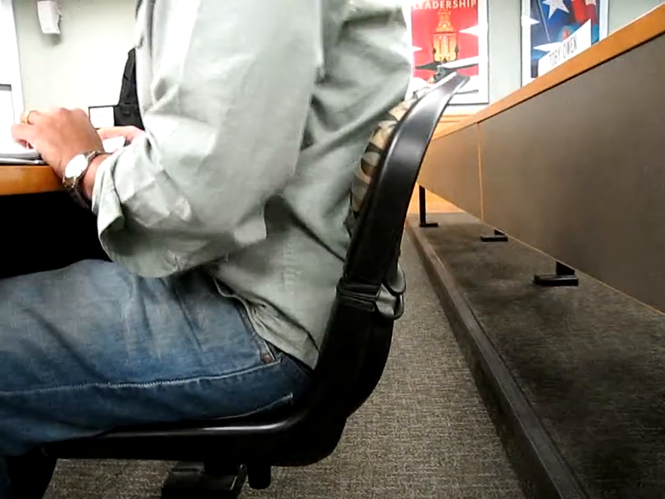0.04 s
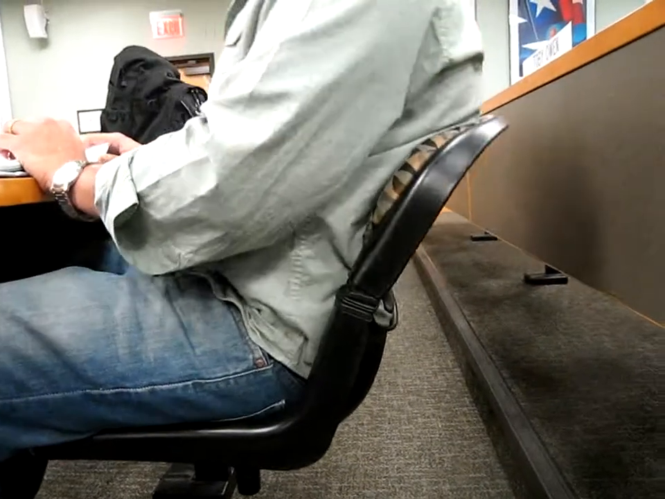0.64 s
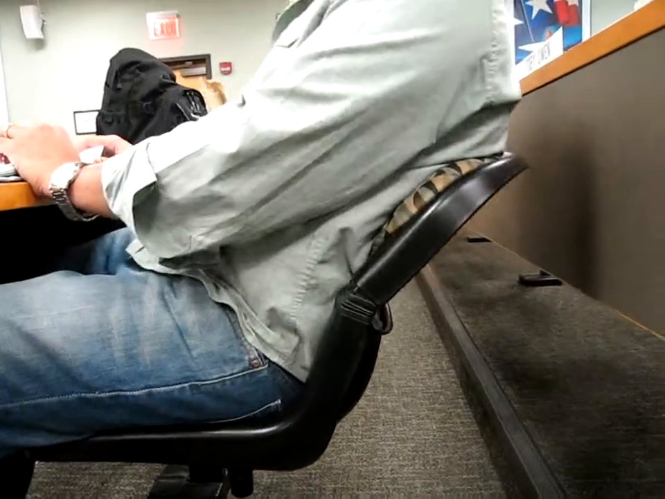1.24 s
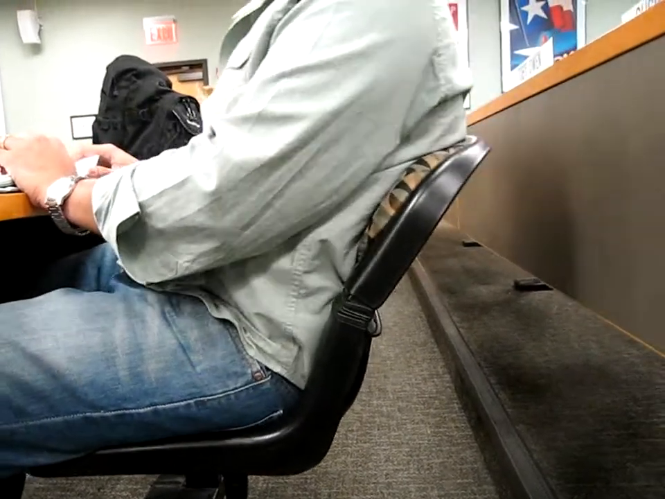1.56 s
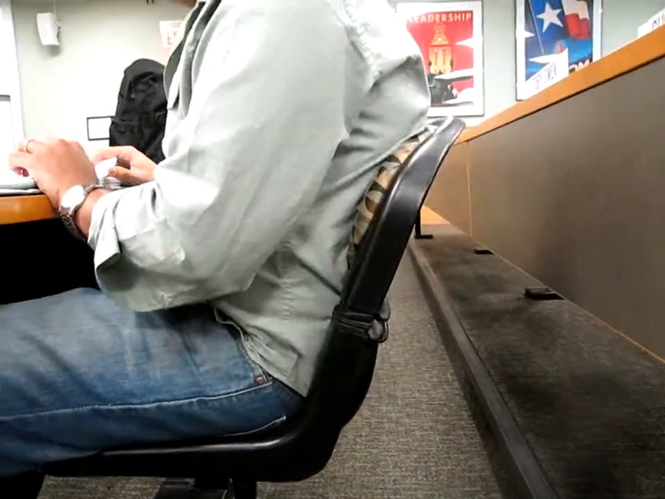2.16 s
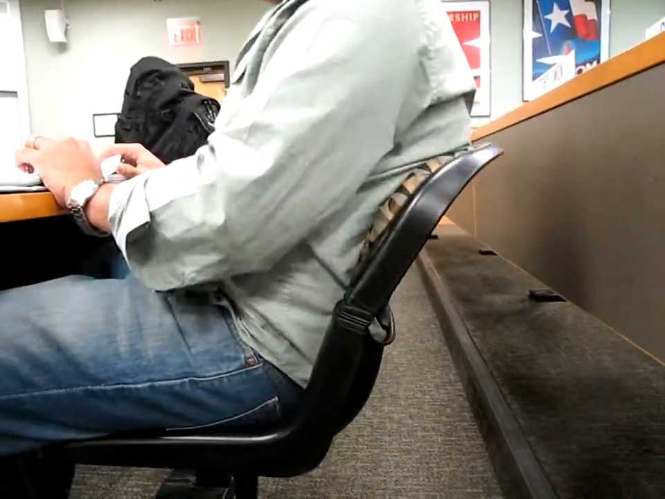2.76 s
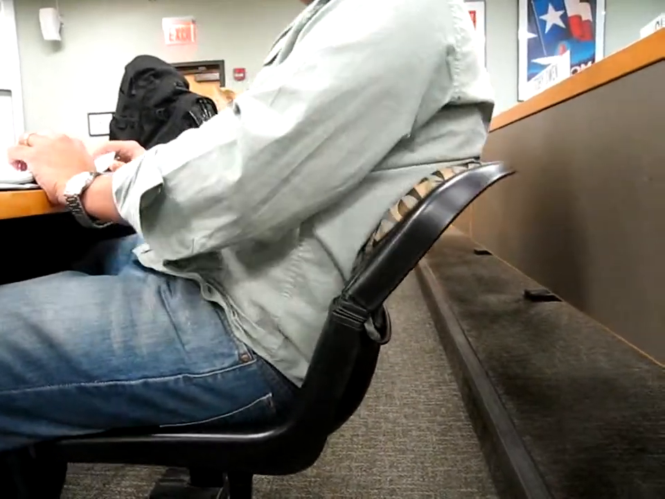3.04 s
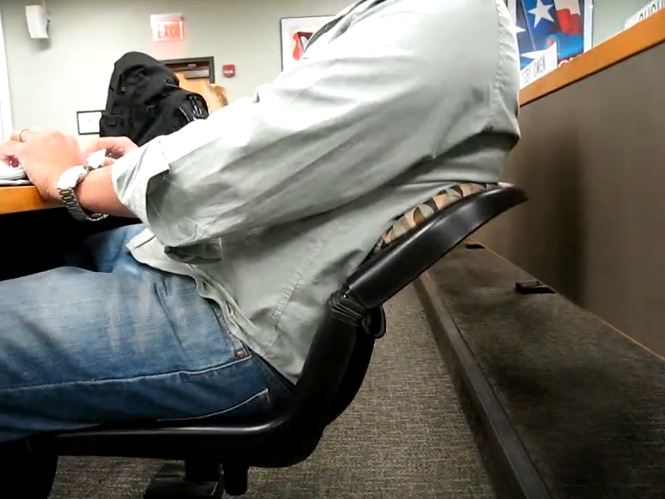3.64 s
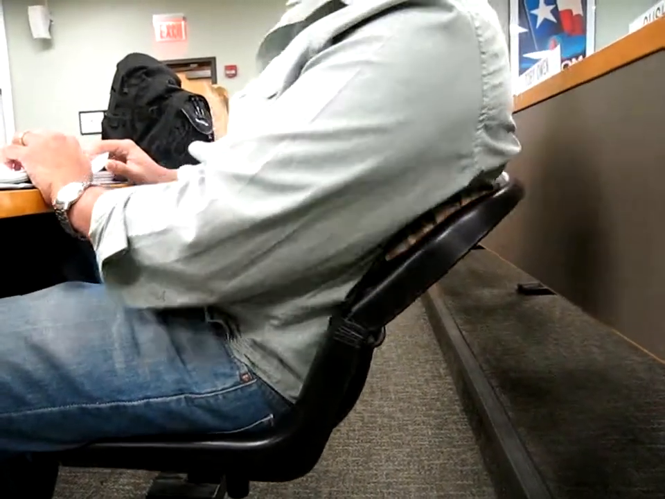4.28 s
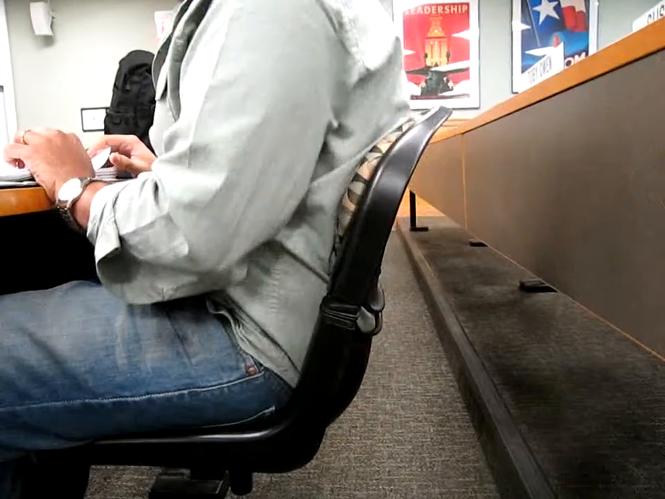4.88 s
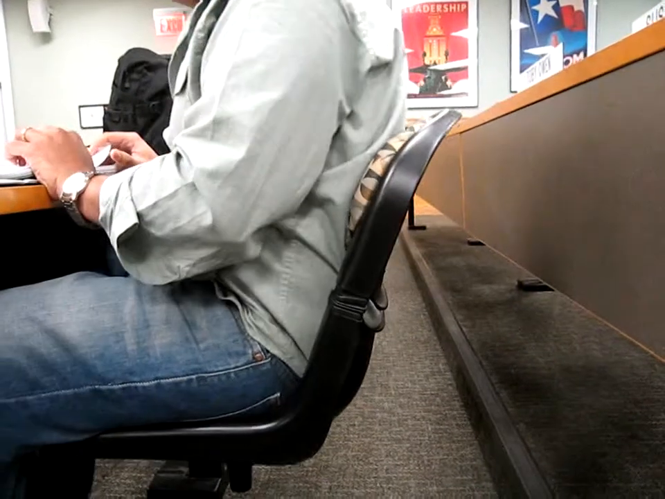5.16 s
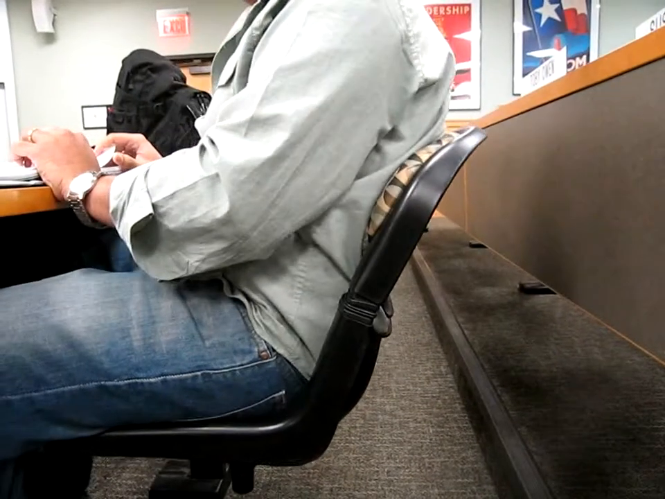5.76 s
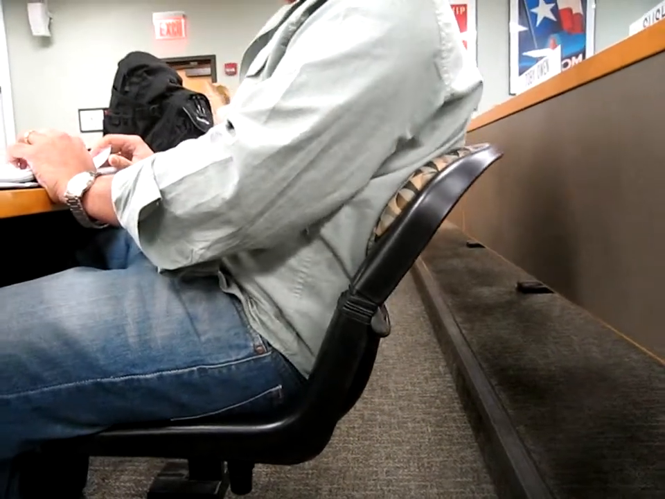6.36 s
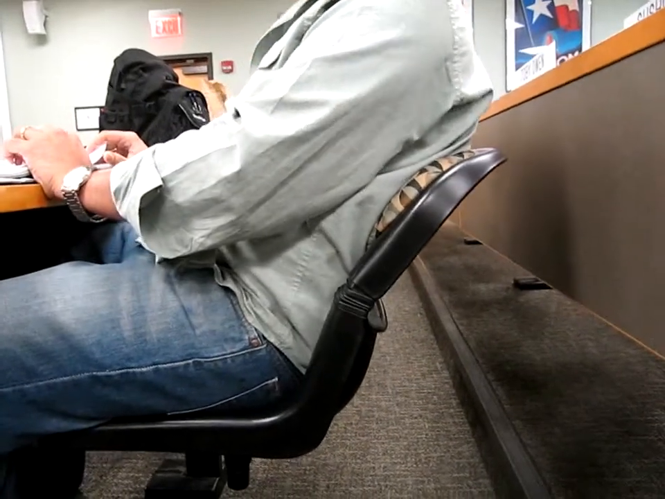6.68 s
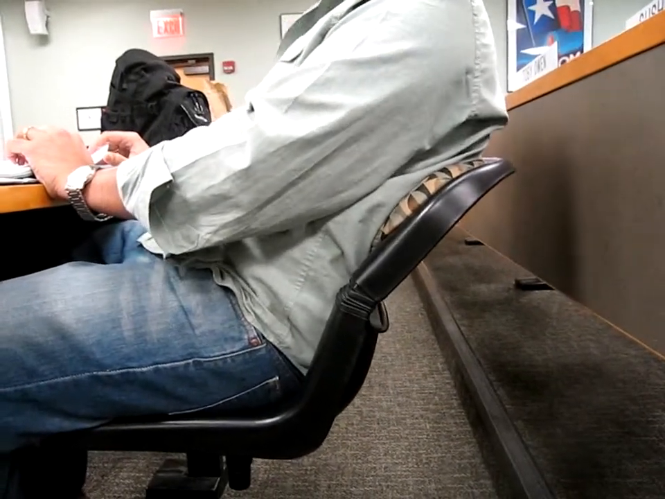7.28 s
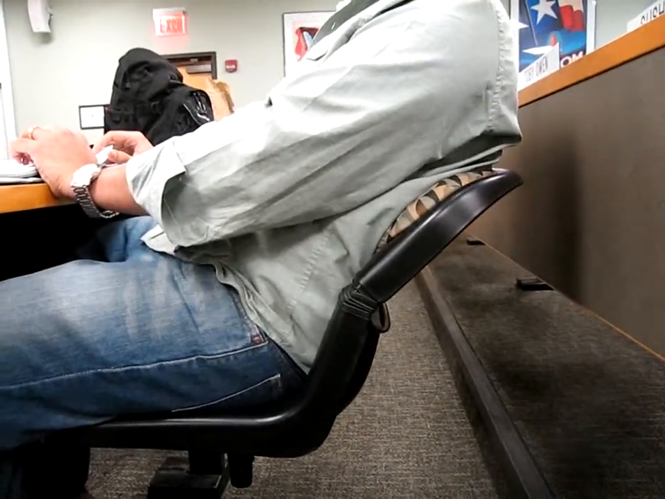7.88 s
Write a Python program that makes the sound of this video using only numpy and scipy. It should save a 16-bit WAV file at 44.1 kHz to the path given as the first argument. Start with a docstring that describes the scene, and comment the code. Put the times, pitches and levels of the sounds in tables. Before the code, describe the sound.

In a quiet, dead-sounding room, ventilation rumbles under a faint high whine while an office chair creaks close by. It grinds and ratchets backward, then rasps forward with a short groan and a few plastic pops. The cycle repeats, with a knock on the return. A last long lean back ratchets and grinds on, broken by a sharp snap from the backrest and some dry ticks.

```python
"""A dry office chair creaks close by as someone rocks in it: stick-slip friction drives its resonances.
Leaning back, the tilt spring slips on its seat in ratcheting runs and the pivot grinds; coming forward,
the pivot rasps and, where its slips turn periodic, briefly groans. The plastic back pops as the load
shifts, the seat knocks against its stops, and there are two faint squeaks. Behind it lies a quiet,
nearly dead room with rumbling ventilation and a thin electrical whine."""
import sys
import numpy as np
from scipy import signal
from scipy.fft import rfft, irfft, next_fast_len
from scipy.io import wavfile
from scipy.ndimage import uniform_filter1d

SR = 44100
rng = np.random.default_rng(int(sys.argv[2]) if len(sys.argv) > 2 else 0)


def to_wav(sig):
    """Store sig (one row per channel, or 1-D mono) as 16-bit WAV at the path in sys.argv[1].

    Samples outside -1..1 are clipped; the rate is SR.
    """
    pcm = np.clip(np.atleast_2d(sig), -1, 1) * 32767
    pcm = np.round(pcm).astype(np.int16)
    wavfile.write(sys.argv[1], SR, pcm.T)  # frames by channels


N = 349272
TIME = np.arange(N) / SR
MIC_TOP_HZ = 6820

# normal modes of the tilt spring and of the frame: f/Hz, bandwidth/Hz, relative level/dB
SPRING_MODES = [(533, 79, -5.5), (945, 87, -41.5), (1060, 100, -20.5), (1251, 18, -3), (1352, 56, -7.5),
                (1572, 28, 0.5), (1711, 57, -0.5), (1898, 32, -2), (2136, 45, -1.5), (2430, 161, -39.5),
                (2377, 42, -12), (2573, 24, -2.5), (2900, 31, -3.5), (2780, 64, -22.5), (3142, 42.4, 2),
                (3550, 31, -23.5), (3620, 86, -5.5), (4100, 23, -16), (3945, 130, -8.5), (4343, 33, 0),
                (4134, 53, -14), (4930, 52, -36), (4650, 120, -24.5), (4720, 38, -7.5), (4820, 450, -18.5),
                (5240, 87, -29)]
FRAME_MODES = [(454, 85, 4.5), (640, 86, -0.5), (903, 196, -0.5), (1060, 78, 4.5), (1110, 163, 2.5),
               (1339, 58, 4.5), (1463, 58, 1), (1635, 31, 3), (1773, 120, -3.5), (2095, 81, 5),
               (2282, 95, 2.5), (2723, 330, 1.5), (2980, 420, 1), (2920, 42, -10), (3390, 140, -12),
               (3700, 280, 4), (3660, 330, -2), (4154, 220, 2.5), (4680, 140, -0.5), (5220, 470, -5)]
# ratcheting runs of the spring: start t/s, end t/s, number of slips, last wait over first wait,
# first and last relative level/dB
RATCHET_RUNS = [(0.494, 0.735, 15, 0.66, -22.5, -20.5), (0.766, 0.817, 3, 1.4, -19.5, -19),
                (0.849, 0.956, 9, 0.5, -16.5, -17), (0.971, 1.097, 7, 2.77, -17, -19),
                (2.762, 2.943, 9, 0.96, -26.5, -23.5), (2.971, 3.05, 6, 0.55, -22, -22.5),
                (3.066, 3.193, 10, 1.18, -20.5, -21.5), (5.298, 5.39, 4, .9, -27, -22),
                (5.423, 5.505, 7, 0.85, -23.5, -18), (5.516, 5.608, 5, 2.4, -19, -16),
                (5.690, 5.765, 4, 0.41, -15, -17), (5.777, 5.871, 8, 0.75, -19, -20.5),
                (5.915, 6.045, 5, 1.7, -21.5, -18.5), (6.086, 6.324, 4, 1.6, -15, -15.5)]


def from_db(db):
    """Amplitude ratio for a level in decibels."""
    return 10 ** (np.asarray(db) / 20)


def unit_rms(x):
    """Normalisation to unit mean power."""
    return x / np.sqrt(np.mean(x ** 2) + 1e-20)


def cut(x, hz, kind, order=2):
    """Butterworth low-pass or high-pass filtering."""
    return signal.sosfilt(signal.butter(order, min(hz, .45 * SR), kind, fs=SR, output="sos"), x)


def drift(per_s):
    """Random modulation of unit rms, interpolated between per_s values a second."""
    knots = rng.standard_normal(int(N / SR * per_s) + 2)
    return unit_rms(np.interp(TIME * per_s, np.arange(len(knots)), knots))


def colour(x, spectrum):
    """Spectral shaping by an envelope of (f/Hz, level/dB) points."""
    hz, db = np.transpose(spectrum)
    size = next_fast_len(N)
    bins = np.maximum(np.arange(size // 2 + 1) * SR / size, 1)
    gain = from_db(np.interp(np.log(bins), np.log(hz), db)) * np.minimum(bins / hz[0], 1)
    return irfft(rfft(x, size) * gain, size)[:N]


def impulses(rows):
    """Impulsive excitation: one pulse for each (t/s, level/dB) row."""
    force = np.zeros(N)
    for s, db in rows:
        force[int(s * SR)] += from_db(db)
    return force


def ringing(modes):
    """Modal superposition: an impulse response of unit energy, from damped modes of alternating sign."""
    t = TIME[:SR // 8]
    ring = sum((-1) ** k * from_db(db) * width * np.exp(-np.pi * width * t) * np.cos(2 * np.pi * hz * t)
               for k, (hz, width, db) in enumerate(modes))
    return ring / np.linalg.norm(ring)


def through(force, response):
    """Convolution: the answer of a linear body to a force."""
    return signal.oaconvolve(force, response)[:N]


def moving_resonance(x, hz, width_hz, block=256):
    """A two-pole resonator whose centre frequency is stepped block by block."""
    out, state = np.zeros(N), np.zeros(2)
    radius = np.exp(-np.pi * width_hz / SR)
    zeros = np.array([1, 0, -1]) * (1 - radius ** 2) / 2
    for i in range(0, N, block):
        poles = [1, -2 * radius * np.cos(2 * np.pi * hz[i] / SR), radius ** 2]
        out[i:i + block], state = signal.lfilter(zeros, poles, x[i:i + block], zi=state)
    return out


def reverberate(x, t60, wet_db):
    """Diffuse reflections build up, then decay exponentially by 60 dB in t60 seconds."""
    t = TIME[:SR // 2]
    tail = rng.standard_normal(len(t)) * from_db(-60 * t / t60) * (1 - np.exp(-8 * t / t60))
    return x + from_db(wet_db) * through(x, tail / np.linalg.norm(tail))


def ventilation(rms_db=-31.5):
    """Broadband noise of moving air, with most of its power at low frequencies."""
    # spectral envelope of the air noise: f/Hz, relative level/dB
    spectrum = [(18, -4.5), (36, -0.5), (61, -7.5), (142, -13.5), (265, -21), (357, -24), (800, -32.5),
                (1370, -36.5), (2100, -34.5), (2740, -41), (5100, -39.5), (6900, -66.5)]
    return from_db(rms_db) * unit_rms(colour(rng.standard_normal(N), spectrum))


def electrical_whine(wander_hz=2.4):
    """Two thin tones under slight random frequency modulation."""
    # tones of the whine: f/Hz, rms level/dB
    tones = [(5414, -50.5), (5610, -52)]
    out = 0
    for hz, db in tones:
        cycles = np.cumsum(hz + wander_hz * drift(18)) / SR
        out += from_db(db) * unit_rms(np.sin(2 * np.pi * cycles))
    return out


def squeaks(waver=.04, flutter_db=3.5):
    """Faint rising tones as the load turns, randomly modulated in frequency and amplitude."""
    # one glide for each squeak: t/s, f/Hz, level/dB
    glides = [
        [(0.368, 1350, -46), (0.385, 1360, -38.5), (0.402, 1400, -41)],
        [(5.135, 2160, -41), (5.175, 2690, -39), (5.195, 2830, -41)],
    ]
    out = 0
    for glide in glides:
        s, hz, db = np.transpose(glide)
        sounding = (TIME >= s[0]) & (TIME <= s[-1])
        envelope = uniform_filter1d(sounding * from_db(np.interp(TIME, s, db)), size=90)
        pitch = np.interp(TIME, s, hz) * (1 + waver * drift(500))
        out += envelope * unit_rms(np.sin(2 * np.pi * np.cumsum(pitch) / SR))
    return out * from_db(flutter_db * drift(110))


def knocks(rattle=0.59):
    """Damped oscillation: the seat meets a stop, or the base rocks, with a soft, rattling bump."""
    # modes struck in seat and base: t/s, level/dB, f/Hz, T60/s
    bumps = [(0.141, -27.5, 42.3, 1), (0.362, -25.5, 45, 0.39), (2.478, -17, 172, 0.16),
             (3.976, -25, 35.3, 0.62), (4.502, -13.5, 381, 0.037), (4.502, -13.5, 580, 0.043),
             (4.503, -20, 188, 0.14), (5.052, -20, 177, 0.16), (5.121, -18, 69.5, 0.11)]
    out, t = np.zeros(N), TIME[:SR // 3]
    for s, db, hz, t60 in bumps:
        start = int(s * SR)
        out[start:start + len(t)] += from_db(db - 60 * t / t60) * np.sin(2 * np.pi * hz * t)
    return out * (1 + rattle * drift(400))


def plastic_pops(thud_hz=750, thud_width_hz=1100, gain_db=5.5, forecrack_s=.0026, forecrack_db=-17.5):
    """The plastic back snaps, exciting heavily damped modes: a bright ring over a dull thud."""
    # snaps of the back: t/s, relative level/dB, ring f/Hz, thud level/dB re the ring's peak
    snaps = [(0.323, -29, 4040, 0), (1.512, -16.5, 5240, -37), (1.842, -4.5, 3570, -23),
             (2.064, -9, 3950, -7), (2.3675, -12, 4250, -11), (2.4594, 0.5, 3990, -4),
             (5.1965, -3.5, 3320, -8.5), (5.198, -2.5, 5220, -38), (5.791, -13, 4700, -24),
             (6.9912, 3, 4350, 1.5), (7.271, -13, 3780, -12)]
    # modes of the plastic: multiple of the ring frequency, bandwidth/Hz, relative level/dB
    modes = [(0.659, 880, -19.5), (0.997, 578, 2), (1.359, 804, -6)]
    out, thud = np.zeros(N), ringing([(thud_hz, thud_width_hz, 0)])
    # a smaller crack runs just ahead of each pop
    forecracks = [(s - forecrack_s, db + forecrack_db, hz, thud_db) for s, db, hz, thud_db in snaps]
    for s, db, hz, thud_db in snaps + forecracks:
        ring = ringing([(hz * multiple, width, mode_db) for multiple, width, mode_db in modes])
        pop = from_db(db + gain_db) * (ring / np.abs(ring).max() + from_db(thud_db) * thud / thud.max())
        start = int(s * SR)
        out[start:start + len(pop)] += pop[:N - start]
    return reverberate(out, t60=0.017, wet_db=-10.0)


def pivot_catches(gain_db=-5.0):
    """Static friction holds the pivot and lets go; each impulse rings the frame with a dry tick."""
    # catches deep in a lean or on the way back: t/s, relative peak level/dB
    releases = [(1.4795, -5.5), (3.7404, -8), (3.7703, -11), (3.7984, -20), (3.808, -15), (3.8178, -13),
                (3.8264, -12), (3.8397, -16), (3.8608, -8.5), (7.5741, -10), (7.7059, -25), (7.7855, -11.5)]
    tick = cut(ringing(FRAME_MODES), 810, "high")
    in_band_peak = np.abs(cut(tick, MIC_TOP_HZ, "low")).max()
    return from_db(gain_db) * through(impulses(releases), tick / in_band_peak)


def micro_slips(per_s, spread_db, clump_db, clumps_per_s):
    """Friction as a Poisson process: tiny slips of uneven size, stronger in clumps."""
    slipping = rng.random(N) < per_s / SR
    direction = rng.choice([-1, 1], N)
    size_db = spread_db * np.clip(rng.standard_normal(N), -2, 2) + clump_db * drift(clumps_per_s)
    return slipping * direction * from_db(size_db)


def stroke_envelopes(stroke, sharpens_db):
    """Amplitude envelopes of the low and high bands in one stroke: rise, sloping hold and fall."""
    start, end, rise, fall, first_db, last_db, high_db = stroke
    along = np.clip((TIME - start) / (end - start), 0, 1)
    gate = np.clip((TIME - start) / rise, 0, 1) * np.clip((end - TIME) / fall, 0, 1)
    low = gate * from_db(first_db + (last_db - first_db) * along)
    return np.array([low, low * from_db(high_db + sharpens_db * (along - .5))])


def follow_strokes(friction, strokes, sharpens_db, low_db, high_db, split_hz=2500):
    """Amplitude modulation: the low band follows the load, the high band the sharpness of the slips."""
    out = 0
    low, high = sum(stroke_envelopes(stroke, sharpens_db) for stroke in strokes)
    for envelope, kind, db in ((low, "low", low_db), (high, "high", high_db)):
        band = cut(cut(friction, split_hz, kind), split_hz, kind)
        power = uniform_filter1d(band ** 2, size=3000)
        out += from_db(db) * envelope * band / np.sqrt(np.abs(power) + 1e-3 * power.mean())
    return out


def slip_rhythm(loose_per_s=205, loose_share=.17, waver=.04):
    """Rate and periodic share of the slips: in a groan the rate glides as periodicity swells and fades."""
    # groans of the pivot: start t/s, end t/s, first and last slip rate/Hz, peak periodic share of power
    groans = [(1.39, 1.49, 412, 400, .52), (1.49, 2.05, 268, 175, .33), (4.38, 4.53, 216, 210, .55),
              (4.53, 4.71, 220, 210, .85)]
    per_s, periodic = np.full(N, float(loose_per_s)), np.full(N, loose_share)
    for start, end, first, last, share in groans:
        inside = (TIME >= start) & (TIME < end)
        along = (TIME[inside] - start) / (end - start)
        per_s[inside] = first + (last - first) * along
        periodic[inside] += (share - loose_share) * np.sin(np.pi * along)
    per_s *= 1 + waver * (1 - periodic) * drift(25)  # the looser the rhythm, the more it wavers
    return per_s, np.clip(periodic, 0, 1)


def groan(per_s, jitter=.011):
    """Relaxation oscillation: one slip a cycle makes a low buzz."""
    cycles = np.cumsum(per_s * (1 + jitter * drift(120))) / SR
    return np.diff(np.floor(cycles), prepend=0) * from_db(drift(200))


def pivot_forward(contact_width_hz=450, sweep_top_hz=7900):
    """Stick-slip of the unloading pivot: random slips rasp, periodic ones groan, the contact resonates."""
    # forward strokes: start t/s, end t/s, rise/s, fall/s, first, last and high-band relative level/dB
    strokes = [(0, 0.131, 0.0025, 0.14, -42.5, -34, -2.5), (0.116, 0.227, 0.042, 0.031, -40, -40, -2.5),
               (1.419, 2.1, 0.004, 0.22, -28.5, -24.5, -3), (4.024, 4.152, .02, .005, -49, -45, 0),
               (4.147, 4.217, 0.0057, .005, -26, -33.5, -3.5),
               (4.213, 4.958, 0.0033, 0.17, -23.5, -27, -3.5),
               (4.959, 5.216, 0.034, 0.02, -35.5, -47, -5.5)]
    # spectral envelope of the rasp: f/Hz, relative level/dB
    spectrum = [(120, -25), (220, -8.5), (480, -0.5), (740, -2.5), (1240, -0.5), (2050, -3.5), (2900, -10),
                (3700, -9), (5600, -17.5), (6900, -37)]
    # resonance of the sliding contact, one path for each long return: t/s, f/Hz, level/dB re the rasp
    contact_paths = [
        [(1.43, 2500, -5), (1.5, 4160, -3), (1.6, 3820, -2.5), (1.7, 1260, -22), (1.82, 2200, -4),
         (1.93, 2260, 0.5)],
        [(4.218, 2810, -1), (4.3, 1160, -12), (4.372, 1370, 7.5), (4.46, 2160, -11), (4.62, 2320, 0),
         (4.85, 1400, -23)],
    ]
    per_s, periodic = slip_rhythm()
    loose = micro_slips(per_s=1500, spread_db=3.5, clump_db=1.5, clumps_per_s=270)
    force = np.sqrt(periodic) * unit_rms(groan(per_s)) + np.sqrt(1 - periodic) * unit_rms(loose)
    # the steel arm smears each slip into a quick downward sweep
    t = TIME[:SR // 250]
    sweep = signal.chirp(t, sweep_top_hz, t[-1], 0)
    rasp = colour(through(force, sweep), spectrum)
    s, hz, db = np.vstack(contact_paths).T
    contact = moving_resonance(rasp, np.interp(TIME, s, hz), contact_width_hz)
    squeal = from_db(np.interp(TIME, s, db)) * contact
    # the friction dulls as the spring unwinds
    return follow_strokes(rasp + squeal, strokes, sharpens_db=-8.0, low_db=-1.0, high_db=-1.0)


def pivot_relief(dip_db=-2.0, ease_s=0.028):
    """Shared motion: while the spring ratchets it takes up the movement, and the pivot grinds less."""
    depth_s = np.max([np.minimum(TIME - start, end - TIME) for start, end, *_ in RATCHET_RUNS], axis=0)
    ratcheting = np.clip(depth_s / ease_s + 1, 0, 1)
    return from_db(dip_db * ratcheting)


def pivot_back(coil_db=-8.0):
    """Forced vibration: the loaded pivot grinds into the frame and, just after, into the spring."""
    # backward strokes: start t/s, end t/s, rise/s, fall/s, first, last and high-band relative level/dB
    strokes = [(0.402, 1.215, 0.1, 0.15, -21, -24, -4), (2.573, 3.289, 0.056, 0.15, -29.5, -21.5, -6.5),
               (3.148, 3.897, 0.36, 0.093, -22.5, -26, -4), (5.187, 6.468, 0.21, 0.36, -28.5, -27.5, -3.5),
               (6.046, 6.99, 0.3, .02, -34, -28.5, -6), (6.985, 7.944, 0.099, .02, -29.5, -30.5, -5)]
    force = micro_slips(per_s=1200, spread_db=3.3, clump_db=1.3, clumps_per_s=120)
    frame = through(force, ringing(FRAME_MODES))
    coil = from_db(coil_db) * through(np.roll(force, SR // 300), ringing(SPRING_MODES))
    grind = cut(frame + coil, 130, "high")
    # the friction sharpens as the spring is wound
    return pivot_relief() * follow_strokes(grind, strokes, sharpens_db=6.5, low_db=0.0, high_db=-4.0)


def ratchet():
    """Slips as (t/s, level/dB): waits form a geometric progression as the backrest speeds up or slows."""
    slips = []
    for start, end, count, slowing, first_db, last_db in RATCHET_RUNS:
        waits = np.geomspace(1, slowing, count - 1)
        along = np.append(0, np.cumsum(waits)) / waits.sum()
        slips += zip(start + (end - start) * along, first_db + (last_db - first_db) * along)
    return slips


def tilt_spring(gain_db=27, grit_db=-12, dispersion=.72, lead_s=.0001, soft_hz=5100, skid_t60=.03):
    """Dispersion: each slip runs along the coil, highs ahead of lows, and rings it with a short twang."""
    twang = cut(ringing(SPRING_MODES), soft_hz, "low", order=4)
    for _ in range(30):  # all-pass stages delay the lows
        twang = signal.lfilter([-dispersion, 1], [1, -dispersion], twang)
    slips = impulses([(s - lead_s + rng.normal(0, 1 / 3000), db) for s, db in ratchet()])
    # the coil skids for a moment before it sticks again
    skid = from_db(-60 * TIME[:SR // 8] / skid_t60)
    grit = from_db(grit_db) * through(slips, skid / np.linalg.norm(skid)) * rng.standard_normal(N)
    return from_db(gain_db) * through(slips + grit, twang)


def scene():
    """Superposition of the chair and the steady background in a carpeted, highly absorbent room."""
    creaks = tilt_spring() + pivot_back() + pivot_forward()
    chair = creaks + pivot_catches() + plastic_pops() + knocks() + squeaks()
    return (reverberate(chair, t60=0.11, wet_db=-20.5) + ventilation() + electrical_whine())[None]


def gain_control(x, threshold_db=-2.5, recovery_db_per_s=61.0, attack_hz=50.0):
    """Dynamic compression: a peak above the threshold turns the gain down, and it creeps back up."""
    excess_db = np.maximum(20 * np.log10(np.abs(x) + 1e-9) - threshold_db, 0)
    recovery_db = recovery_db_per_s * TIME
    reduction_db = np.maximum.accumulate(excess_db + recovery_db, axis=-1) - recovery_db
    return x * from_db(-cut(reduction_db, attack_hz, "low", order=1))


def record(dry, ceiling=.62, stopband_hz=7900):
    """Band limiting and clipping: a narrow-band microphone with gain control flattens the top peaks."""
    rolled_off = cut(dry, MIC_TOP_HZ, "low", order=8)
    clipped = np.clip(gain_control(rolled_off), -ceiling, ceiling)
    return signal.sosfilt(signal.cheby2(12, 70, stopband_hz, fs=SR, output="sos"), clipped)


dry = scene()
out = record(dry)
to_wav(out)
```